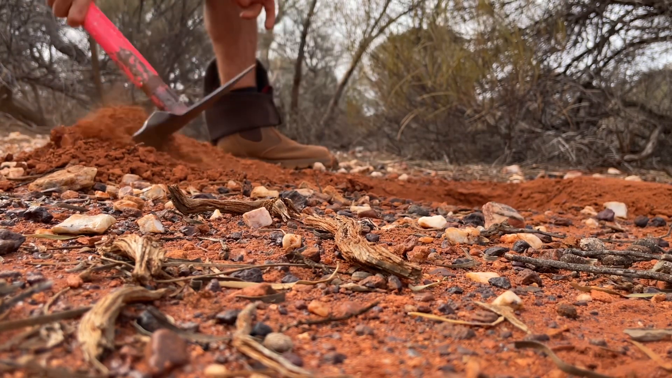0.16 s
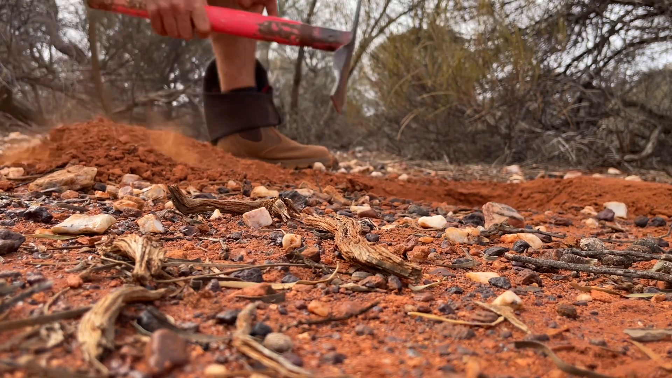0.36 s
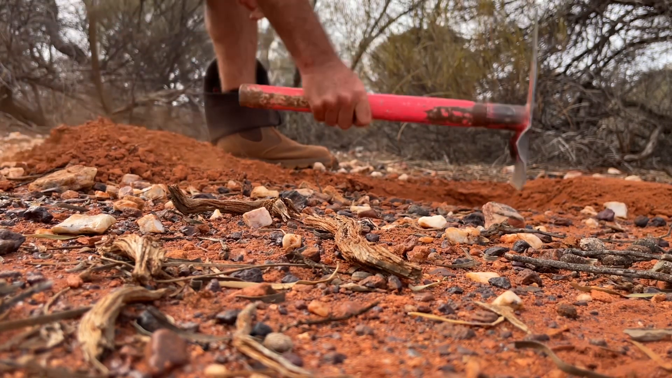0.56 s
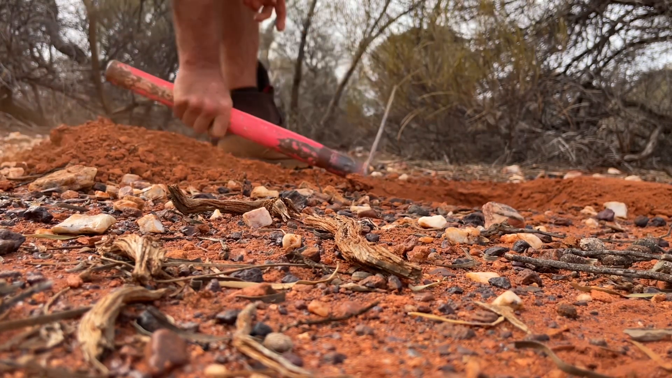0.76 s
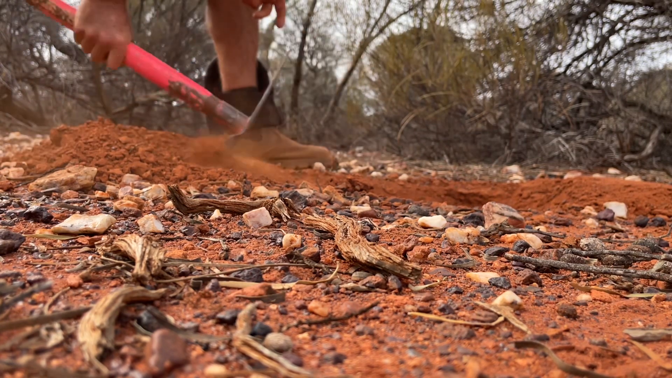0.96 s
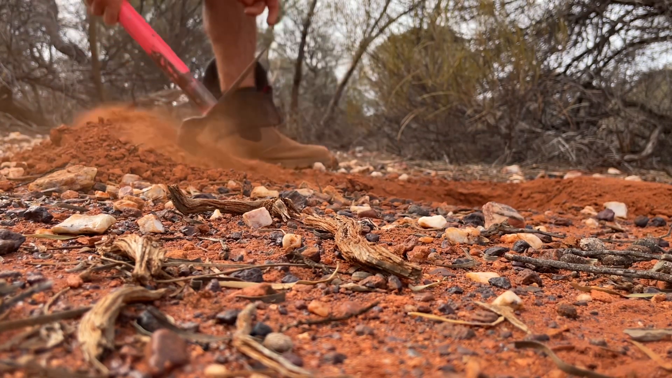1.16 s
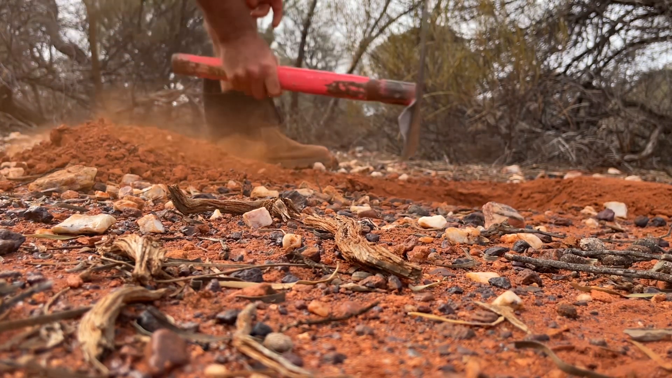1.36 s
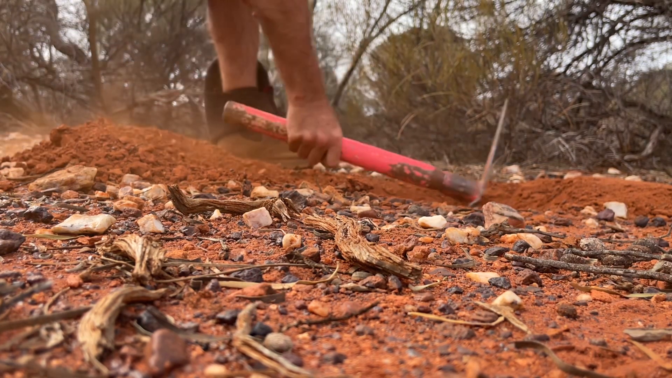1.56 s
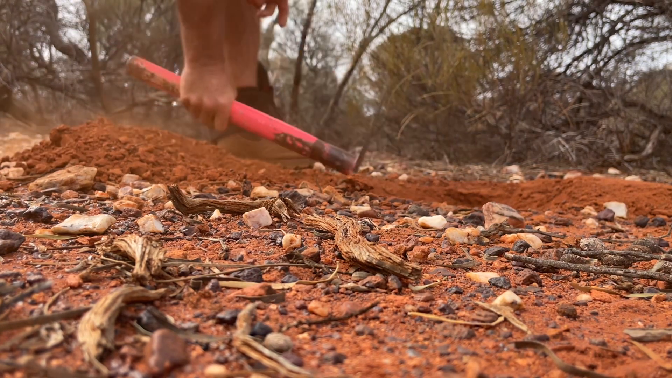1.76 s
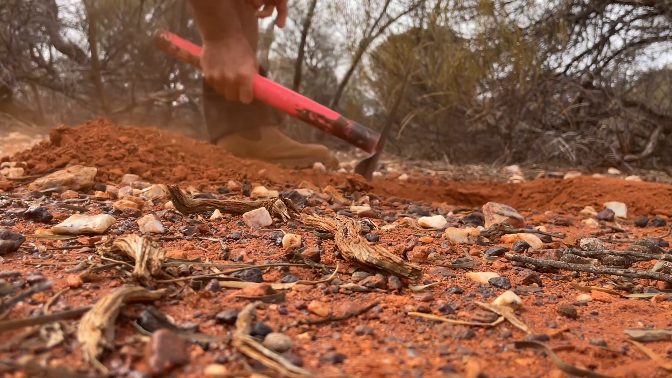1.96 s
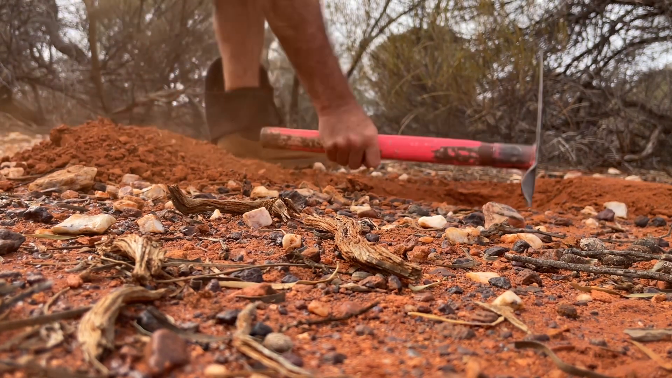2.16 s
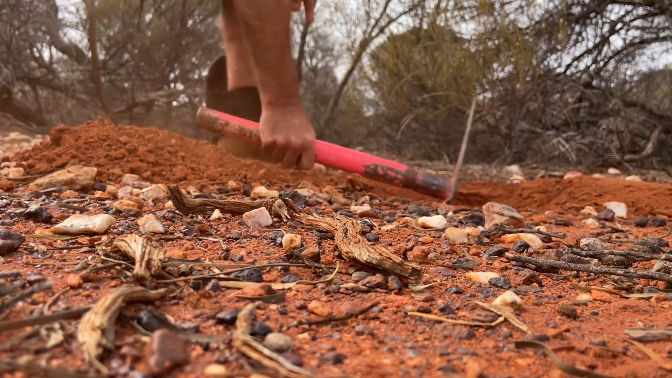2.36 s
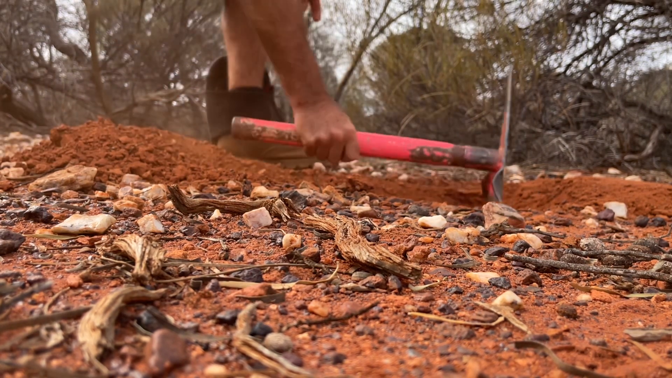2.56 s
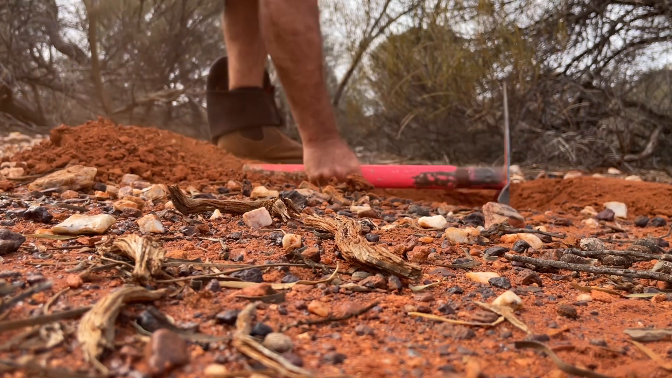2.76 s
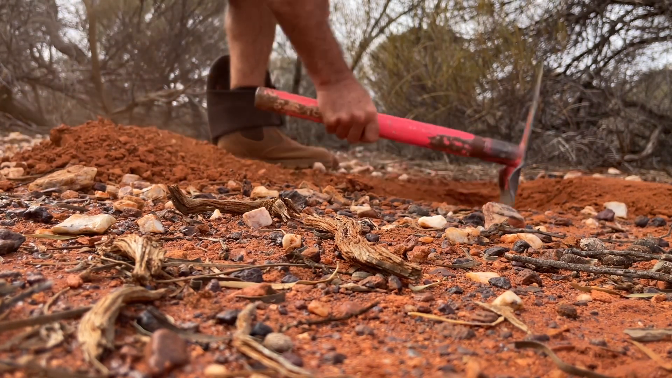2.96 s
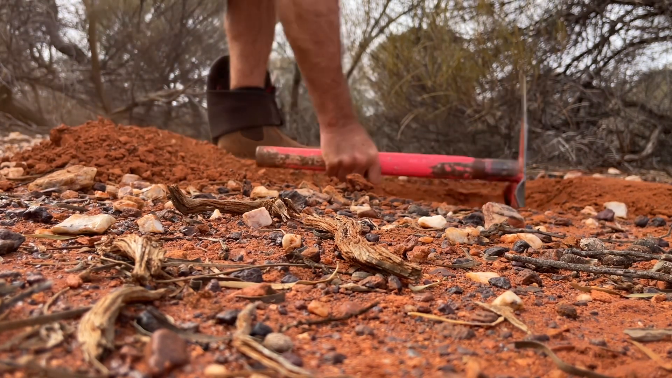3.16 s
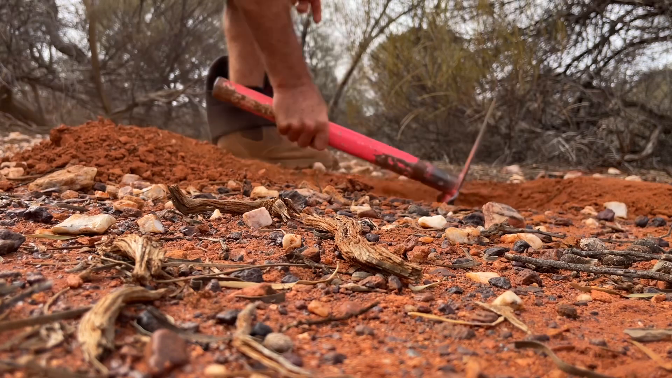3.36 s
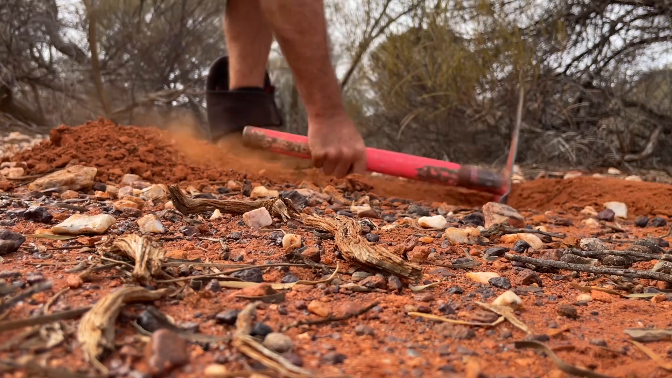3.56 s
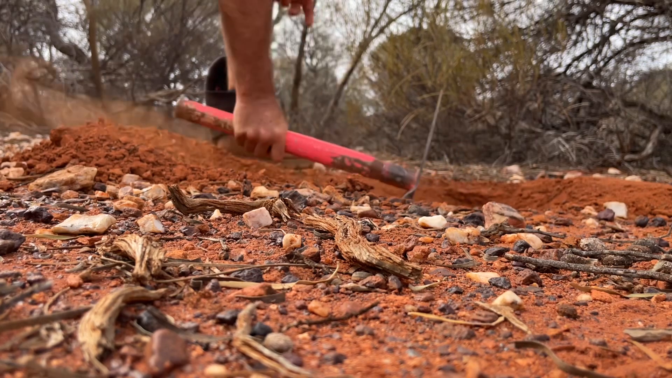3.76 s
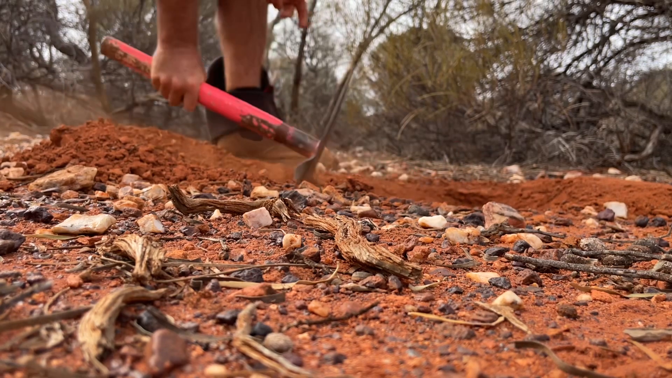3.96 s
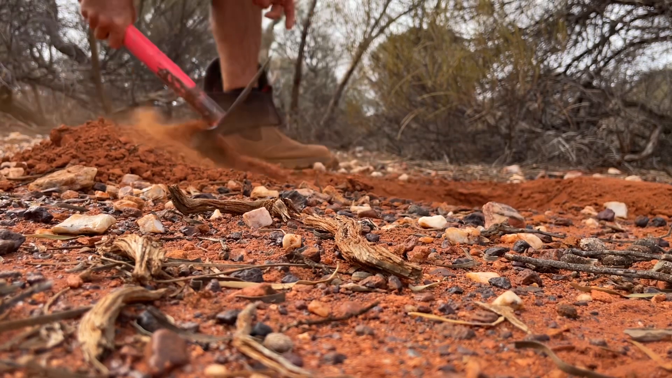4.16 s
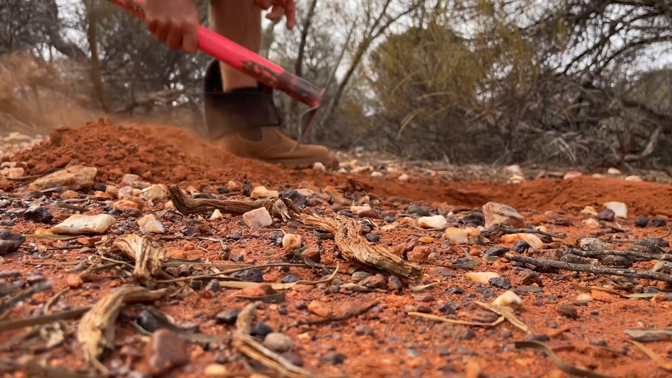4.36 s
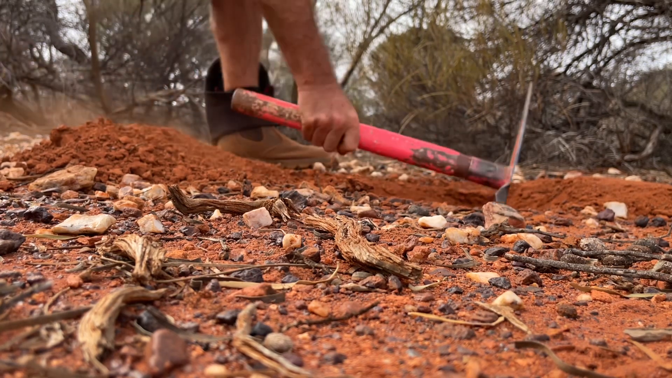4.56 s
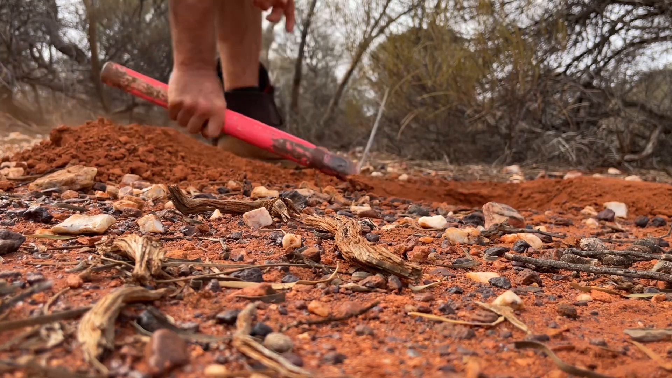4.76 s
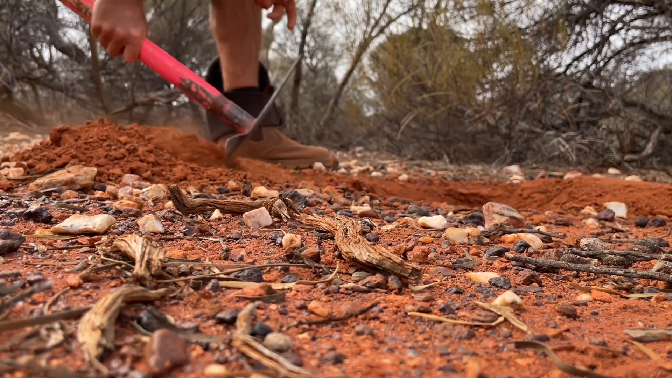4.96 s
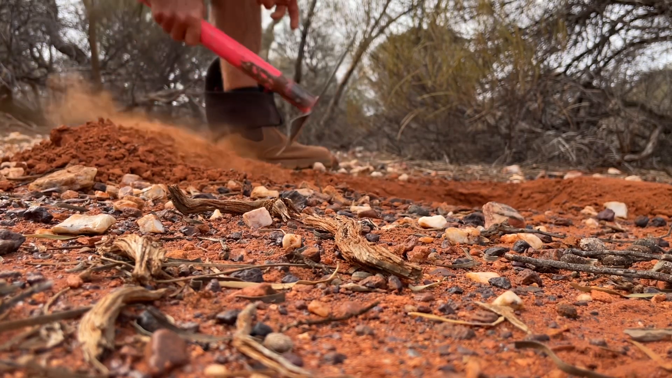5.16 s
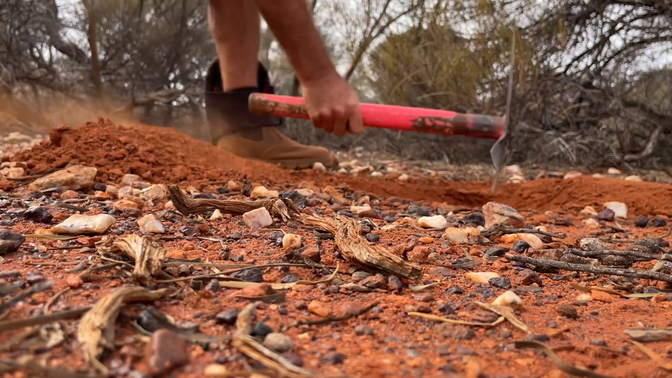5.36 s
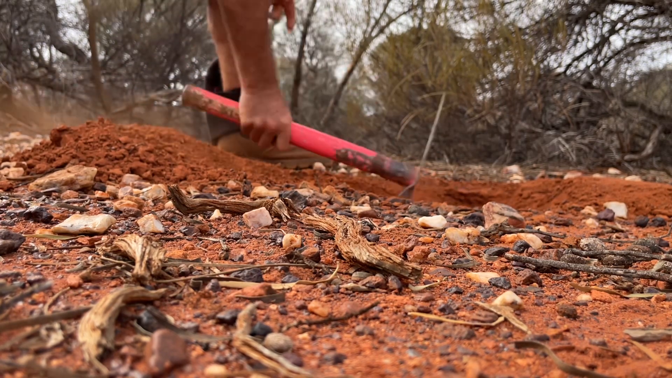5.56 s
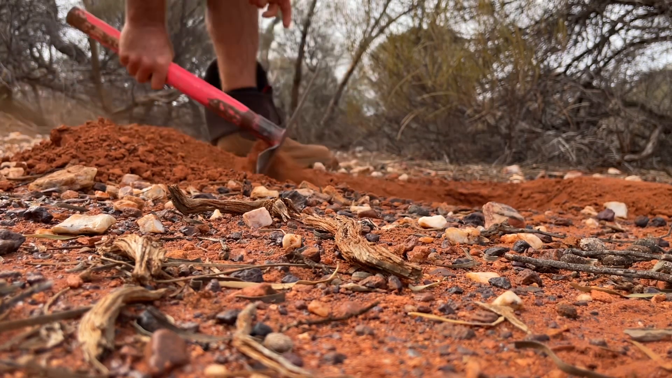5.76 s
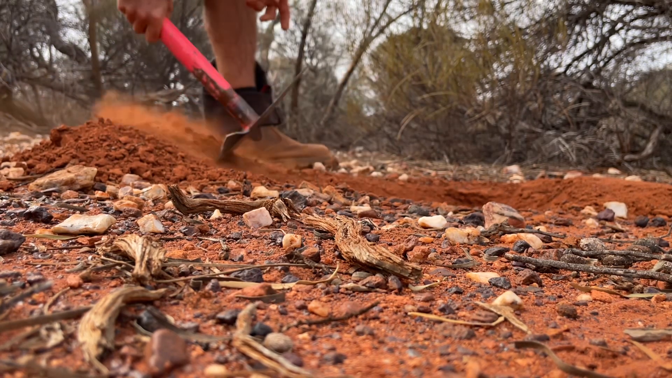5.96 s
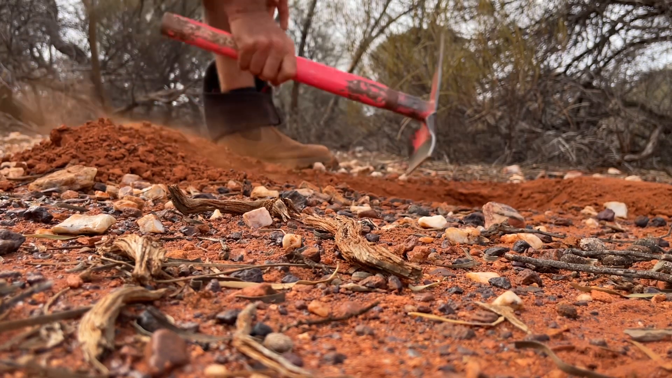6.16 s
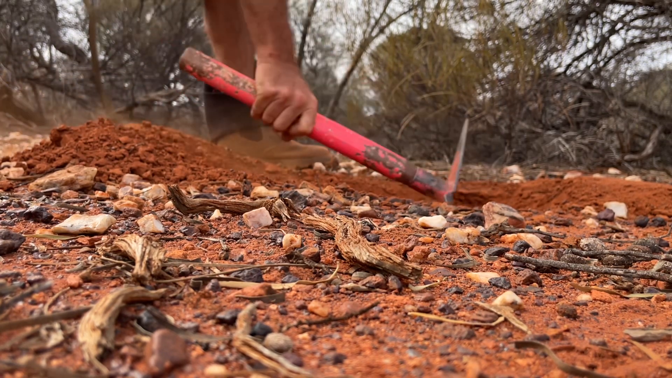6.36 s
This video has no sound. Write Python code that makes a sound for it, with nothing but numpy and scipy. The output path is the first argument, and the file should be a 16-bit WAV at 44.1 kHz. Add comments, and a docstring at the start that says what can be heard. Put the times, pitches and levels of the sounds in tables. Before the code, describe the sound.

Close, gritty digging: pick blows thump and drag through gravelly earth, stones clack, steel rings briefly, and loose dust patters down outdoors.

```python
"""Close to a ground-level microphone, the last scrape of a steel pick's stroke is already under way and a first
cloud of dust comes down. Then the pick chops into dry stony soil, nine strokes 0.4 to 1 s apart: each bite thuds,
and the blade is dragged on through clods and grit (damped grains), cracks against stones (noise bursts) and rings
(bending modes). Between strokes the freed blade sings, boots shift and thrown dust hisses down (fine filtered
grains). Faint wind in the bush (patchy filtered noise) lies behind it all from start to end."""
import sys
import numpy as np
from scipy import signal
from scipy.fft import rfft, irfft, next_fast_len
from scipy.io import wavfile
from scipy.ndimage import uniform_filter1d, map_coordinates

SR = 44100
rng = np.random.default_rng(int(sys.argv[2]) if len(sys.argv) > 2 else 0)


def put_to_file(sound):
    """Save the sound as 16-bit audio at rate SR, in the file named by the first command-line argument."""
    columns = np.atleast_2d(sound).T  # one column per channel
    safe = np.clip(columns, -1, 1)
    whole_steps = np.round(safe * 32767)
    wavfile.write(sys.argv[1], SR, whole_steps.astype(np.int16))


N = 286644

# the blade bites, ploughs in until it jams, and is pulled free:
# (bite [s], jam [s], length of pull [s], soil at the jam [dB], grit at the jam [dB], rise up to the jam [dB],
#  fade over the pull [dB], pitch shift of loose pieces [octaves], pitch round which stray notes lie [Hz],
#  scrape ring [dB], bite [dB], bite thud [dB], its nominal pitch [Hz], jam thud [dB], its nominal pitch [Hz])
STROKES = [(0.584, .776, 0.27, -26.5, -29, 7.5, 20.5, 0.13, 3060, -2, -32.5, -21.5, 181, -15, 158.4),
           (1.475, 1.722, 0.083, -29, -31.5, 5.5, 3, 0.15, 5200, -3.5, -48.5, -23.5, 101, -20, 161.4),
           (2.145, 2.251, 0.054, -31, -34, 8, 5.5, -.2, 3860, -2.5, -39, -12.5, 120, -32.5, 183),
           (2.683, 2.772, 0.026, -35.5, -37.5, -3, 2, -0.23, 6580, -1.5, -28.5, -10, 137.3, -36, 179),
           (3.106, 3.166, 0.063, -33.5, -37.5, -9, -3.5, -0.018, 2370, 1.5, -24, -13.5, 129, -17.5, 134),
           (3.533, 3.875, 0.12, -30.5, -34, 3.5, 6, 0.053, 2610, -6, -27.5, -17.5, 129, -14, 181.7),
           (4.537, 4.752, 0.22, -25.5, -30, 16, 17.5, .35, 3470, 2, -29.5, -23, 164.4, -23.5, 184.8),
           (5.413, 5.637, 0.16, -28.5, -32, 9.5, 8, -0.16, 4740, -2, -23, -23, 139.7, -15, 140.5),
           (6.284, 6.377, 0.12, -33.5, -36.5, 10, -5.5, 0.23, 3470, 2.5, -38, -15.5, 162, -24.5, 195)]
# bending modes of the pick head: (frequency [Hz], level [dB], t60 when undamped [s])
STEEL_MODES = [(1138, -14, .06), (1560, -8, .09), (2345, -4, .15), (3012, -6.5, .38), (3280, -6, .3),
               (3590, 0, .1), (4262, -10, .07), (4899, -3, .11), (5672, -9, .15), (6032, -6, .12),
               (6510, -14, .16), (10000, -16, .14), (10900, -19, .1), (12420, -21, .12)]


def drags():
    """Clods tumble and shake the handle; grit and pebbles rasp along the steel and keep it ringing."""
    # spectra of churned soil and scraped grit: (frequency [Hz], relative level [dB per Hz])
    soil_spectrum = [(30, -68), (60, 3.5), (100, 7), (160, 7), (270, -1), (390, 3.5), (600, -2.5),
                     (850, -12), (1400, -26), (3000, -52)]
    grit_spectrum = [(400, -10), (900, -1.5), (1500, 3), (2600, -1.5), (3500, 7), (4200, -19.5),
                     (6000, -8.5), (7300, -41.5), (8500, -48), (10200, -13), (13200, -15.5), (14300, -18),
                     (16000, -29.5)]
    # modes of the handle carrying the head: (frequency [Hz], level [dB], t60 [s])
    handle_modes = [(131, -5, 0.18), (157.7, -3, 0.3), (193, -6, 0.22), (357.2, -8, 0.13),
                    (555, -8, 0.0377)]
    soil_gain, grit_gain = effort()
    piece_octaves, _, ring_db = by_stroke()

    crunch = soil_gain * grains(rate=2400, spread_db=1.5, clump_rate=140, clump_db=3.0)
    clods = soil_gain * lumps(count=1700, centre_hz=441.5, octaves=0.403, cycles=2.4,
                              spread_db=10, shift=piece_octaves)
    handle = rubbed(crunch, handle_modes, damping=1, flicker_rate=11, flicker_db=8.5)
    soil = amp(-7) * colour(crunch, soil_spectrum) + amp(-8.5) * clods + amp(-8.0) * handle

    # the blade catches and breaks free
    slips = unit(amp(5.5 * np.tanh(.7 * wobble(170) + wobble(75))))
    scrape = slips * grains(rate=9000, spread_db=2, clump_rate=250, clump_db=4)
    grit = colour(grit_gain * scrape, grit_spectrum)
    pebbles = grit_gain * slips * lumps(count=2200, centre_hz=2257, octaves=0.59, cycles=5.6,
                                        spread_db=7, shift=piece_octaves)
    # bigger pieces knock
    cobbles = grit_gain * lumps(count=900, centre_hz=1310, octaves=.7, cycles=1.7,
                                spread_db=7.0, shift=piece_octaves)
    steel_force = amp(ring_db) * pressed(grit_gain) * scrape
    steel = rubbed(steel_force, STEEL_MODES, damping=4, flicker_rate=32, flicker_db=8)
    return soil + amp(-12.0) * grit + amp(-16.0) * pebbles + amp(-11.5) * cobbles + amp(-14) * steel


def effort():
    """Gains of soil and grit: most grow with depth to the jam, ease in the pull and die as the blade leaves."""
    # brief scrapes of soil and grit: (middle [s], half length [s], soil [dB], grit [dB])
    brief_scrapes = [(.005, 0.026, -36, -32.5), (0.069, 0.028, -40, -34.5), (0.166, 0.03, -68.5, -46.5),
                     (1.202, 0.019, -47.5, -51.5), (2.365, 0.012, -40.5, -42), (2.429, 0.019, -66, -45),
                     (4.007, 0.016, -41, -36), (4.099, 0.046, -38, -35), (5.825, 0.095, -73, -49.5)]
    # the blade loses its grip in the drag: (middle [s], half length [s])
    skips = [(0.915, 0.0084), (3.663, .014), (3.731, .02), (4.831, 0.016)]
    skip_db = -10  # fall of the grit in a skip; the soil falls half as far
    # after the bite the pick stalls before the pull takes hold
    rebound_s, rebound_half_s, rebound_db = 0.029, 0.022, -4
    attack_s = 0.005
    soil_release, grit_release = 311, 338  # dB per s once the pull is over
    # spurt of grit as the edge breaks the crust, relative to the bite
    crust_db, crust_decay_s = -7.5, 0.016
    # soil crushed by the bite, relative to its thud
    crush_db, crush_decay_s = -12.5, 0.0094

    soil, grit, t = np.zeros(N), np.zeros(N), np.arange(SR) / SR
    stalled = rebound_db * np.exp(-((t - rebound_s) / rebound_half_s) ** 2)
    attack = np.minimum(t / attack_s, 1)
    for bite, jam, pull, soil_db, grit_db, rise_db, fade_db, _, _, _, bite_db, thud_db, *_ in STROKES:
        push = jam - bite
        shallow = rise_db * np.clip(1 - t / push, 0, 1)
        eased = fade_db * np.clip((t - push) / pull, 0, 1)
        free_s = np.maximum(t - push - pull, 0)
        course_db = stalled - shallow - eased
        crust = amp(bite_db + crust_db) * np.exp(-t / crust_decay_s)
        crushed = amp(thud_db + crush_db) * np.exp(-t / crush_decay_s)
        add(soil, bite, attack * (crushed + amp(soil_db + course_db - soil_release * free_s)))
        add(grit, bite, attack * (crust + amp(grit_db + course_db - grit_release * free_s)))
    for s, half_length, soil_db, grit_db in brief_scrapes:
        swell = swell_at(s, half_length)
        soil += amp(soil_db) * swell
        grit += amp(grit_db) * swell
    skipped_db = skip_db * sum(swell_at(s, half_length) for s, half_length in skips)
    return soil * amp(skipped_db / 2), grit * amp(skipped_db)


def by_stroke():
    """Per sample, held from bite to bite: pitch shift of loose pieces, pitch of stray notes, ring level."""
    rows = np.array(STROKES)
    bites = rows[:, 0]
    stroke = np.maximum(np.searchsorted(bites, np.arange(N) / SR, side="right") - 1, 0)
    piece_octaves, ring_hz, ring_db = rows[:, 7:10].T
    return piece_octaves[stroke], ring_hz[stroke], ring_db[stroke]


def pressed(grit_gain):
    """The part of the scrape that rings the steel: a light touch hardly does."""
    press_db = -44.5  # below this level of scrape the steel rings less and less
    return grit_gain * np.minimum(grit_gain / amp(press_db), 1)


def thuds():
    """The pitch of the thump falls as the ground takes up the blow."""
    out, t = np.zeros(N), np.arange(SR // 8) / SR
    u = t / 0.014
    swell = (u * np.exp(1 - u)) ** 6.9 + 0.076 * u * np.exp(1 - u) ** 0.46
    for s, db, hz in blows():
        pitch = hz * (0.743 + 3 * np.exp(-t / 0.00535))
        add(out, s, amp(db - 3.5) * swell * np.sin(2 * np.pi * np.cumsum(pitch) / SR))
    return out


def blows():
    """(time [s], level [dB], nominal pitch [Hz]) of every thud: each stroke's bite and jam, and the boots."""
    # a boot shifts: (time [s], relative level [dB], nominal pitch [Hz])
    steps = [(0.983, -33.5, 103), (3.489, -34, 77.7), (5.061, -25.5, 86), (5.157, -39, 75.4)]
    lag_s = 0.0012  # the ground takes up the blow just after the edge touches
    bites = [(bite + lag_s, db, hz) for bite, *_, db, hz, jam_db, jam_hz in STROKES]
    jams = [(jam, jam_db, jam_hz) for bite, jam, *_, jam_db, jam_hz in STROKES]
    return bites + jams + steps


def bursts():
    """A hard clod gives way in one short, dull crunch of noise round its own pitch."""
    # a hard clod bursts under the blade: (time [s], relative level [dB], pitch [Hz])
    hard_clods = [(0.813, -20.5, 400), (1.649, -27, 604), (2.25, -20, 560), (2.275, -29, 480),
                  (2.687, -19.5, 297), (2.767, -23.5, 370), (3.112, -20.5, 560), (3.76, -20.5, 425),
                  (3.845, -22.5, 397), (3.996, -23, 404), (4.858, -22.5, 424), (5.688, -25, 393),
                  (5.762, -24, 370), (6.326, -23, 447)]
    peak_s = 0.0041  # time to the height of a burst
    slope_db = 20.5  # fall of its spectrum per octave either side of its pitch
    out, t = np.zeros(N), np.arange(SR // 16) / SR
    force = t / peak_s * np.exp(1 - t / peak_s)
    for s, db, hz in hard_clods:
        spectrum = [(hz * 2. ** octave, -slope_db * abs(octave)) for octave in range(-3, 6)]
        add(out, s, amp(db - 6) * noise_burst(force, spectrum))
    return out


def stones():
    """A stone grinds for milliseconds: a knock in the soil, a crack, a snap, its own note and a ring of steel."""
    # spectra of the dull knock, the crack and the bright snap: (frequency [Hz], relative level [dB per Hz])
    knock_spectrum = [(80, -34.5), (250, -3.5), (600, 6.5), (1000, -10.5), (2000, -21.5)]
    crack_spectrum = [(500, -23), (1000, 3.5), (1800, -1), (3300, 1.5), (4500, -4.5), (6000, -3.5),
                      (7500, -27.5)]
    snap_spectrum = [(2500, -42), (4500, -13.5), (6200, -10.5), (7400, 0.5), (8600, -6.5), (10500, -4.5),
                     (13000, -6), (16000, -33)]
    out, t = np.zeros(N), np.arange(SR // 16) / SR
    for s, db, knock_db, snap_db, ring_db, clink_hz in contacts():
        grind = np.interp(db, [-14, -4], [.007, .004])  # s; the hardest blows are the shortest
        decay = np.exp(-(t / grind) ** 2) + 0.0064 * np.exp(-t / 0.0037)
        force = (1 - np.exp(-t / (0.27 * grind))) * decay
        # the crack gathers round the clink pitch
        crack = [(hz, level - 6 * abs(np.log2(hz / clink_hz))) for hz, level in crack_spectrum]
        parts = (crack, -6), (knock_spectrum, knock_db), (snap_spectrum, snap_db - 14.5)
        for spectrum, part_db in parts:
            add(out, s, amp(db + part_db) * noise_burst(force, spectrum))
        add(out, s, stone_note(t, db, clink_hz))
        ring = blade(damping=3.6, scatter_db=4, near_hz=clink_hz, focus_db=16)
        add(out, s, amp(db + ring_db - 2.5) * swelling(ring, 0.0016))
    return out


def contacts():
    """Every hard contact of the steel: the tick that opens each stroke, and the stones."""
    # the blade meets a stone: (time [s], relative level [dB], then over it: dull knock [dB], bright snap [dB],
    # blade ring [dB]; clink pitch [Hz])
    stone_hits = [(0.5998, -26, 0.5, -8, -6, 1140), (0.6658, -27.5, 1.5, -21, 1, 3200),
                  (0.7309, -30, -9.5, -21, 4, 4600), (0.753, -32, 11, -21, -1, 2900),
                  (0.762, -13, -1.5, -17.5, 10, 1400), (0.7831, -19.5, 1.5, -37, 0.5, 3230),
                  (0.905, -23, -3.5, -3.5, -26, 3300), (0.9365, -20.5, -11, 1, -8, 2870),
                  (1.482, -31.5, 1.5, -10.5, -2, 1230), (1.6274, -30, 15, -12, 15, 1770),
                  (1.653, -30.5, -2, -14, 9, 4570), (1.706, -25.5, 5.5, -29, 0, 3030),
                  (1.7478, -17.5, 1.5, -44.5, 6, 1940), (2.145, -33.5, 8.5, -11, -2, 1420),
                  (2.1827, -30, 1, -4, -12, 1210), (2.2512, -35, 10, -21, -15, 3460),
                  (2.4166, -41.5, 4, 3, 4, 4830), (2.686, -31, 7, 4, -1, 6600),
                  (3.1068, -27, 4.5, -8, -14, 3160), (3.1705, -17, -0.5, -9, -29, 2430),
                  (3.204, -23, -2.5, -12, -13, 1820), (3.2199, -23.5, -11, -26, -9, 1810),
                  (3.3288, -50, 11, -21, -9, 1230), (3.681, -37.5, 8.5, -15, -31, 2880),
                  (3.753, -38.5, -9, -26, 10.5, 2860), (3.8063, -18.5, -5.5, -9, 0.5, 5120),
                  (3.823, -20, -1, -27, -16, 3370), (3.877, -12, -3, -17, -3, 2955),
                  (3.8993, -18.5, -3, -35, 2, 1210), (3.947, -27.5, 4.5, -31, -7, 1390),
                  (4.018, -23, -6.5, -8, -11, 2900), (4.0817, -25, -5, -12.5, -17, 1520),
                  (4.2876, -46, -10, -4, 6, 1210), (4.71, -17.5, 1, -30, -13, 1870),
                  (4.7544, -10.5, -2.5, -30.5, -17, 1666), (4.7595, -13, -12, -22.5, 12, 1440),
                  (4.799, -29.5, 2, -18.5, 4, 3520), (4.883, -28, -10, -13, 0, 2530),
                  (4.9176, -25, -7, -5.5, 2, 3380), (5.5758, -27, -1, -9, 11.5, 5000),
                  (5.6346, -3, -16, -18, -27, 2153), (5.659, -27.5, -13, -23, -9, 1190),
                  (6.0086, -40, -8, 12.5, -21, 4200), (6.324, -27, -15, -8, -7, 1480),
                  (6.375, -26, 9, -16, 7.5, 5000), (6.4173, -24, -5.5, -8, 7, 3670),
                  (6.4777, -22.5, 2.5, -18, 15, 1600)]
    # the edge ticks on the crust: (level over the bite [dB], knock [dB], snap [dB], ring [dB], clink pitch [Hz])
    bite_tick = (-3.5, -2.5, 10, -10.5, 2803.5)
    tick_db, *tick_colour = bite_tick
    ticks = [(bite, bite_db + tick_db, *tick_colour) for bite, *_, bite_db, _, _, _, _ in STROKES]
    return ticks + stone_hits


def stone_note(t, db, clink_hz):
    """The brief note of the stone itself, which only a hard blow brings out."""
    # a struck stone's own modes: (multiple of its clink pitch, level [dB], t60 [s])
    note_modes = [(0.998, 9, 0.0097), (1.986, -8.5, 0.029)]
    note_db, grows = 0.5, 0.26  # relative to a full-scale blow; further dB for each dB of force
    note = sum(amp(level - 60 * t / t60) * np.sin(2 * np.pi * multiple * clink_hz * t)
               for multiple, level, t60 in note_modes)
    return amp(db + note_db + grows * db) * note * (1 - np.exp(-t / 0.0018))


def sings():
    """A pebble dragged along the steel excites one mode; faint notes fall at random round the stroke's pitch."""
    # a pebble rubs the blade into a short note: (time [s], level [dB], mode [Hz])
    clear_notes = [(0.618, -40.5, 3280), (0.828, -35, 3280), (1.685, -41.5, 6032), (1.783, -45, 6032),
                   (2.698, -39, 3280), (4.772, -29.5, 3012), (5.415, -36, 3280), (6.419, -31.5, 3590),
                   (6.448, -32, 3280)]
    swell_s = 0.0091  # time to the height of a note
    stray_db = -13  # the many fainter notes, relative to the scraped grit
    out, t = np.zeros(N), np.arange(SR // 16) / SR
    modes = np.array(STEEL_MODES)[:, 0]
    _, grit_gain = effort()
    _, ring_hz, ring_db = by_stroke()

    start = rng.integers(0, N, 260)
    interval, size = np.clip(rng.standard_normal((2, len(start))), -2, 1.5)
    stray_gain = pressed(grit_gain)[start] * amp(stray_db + ring_db[start] + 2 * size)
    stray_hz = ring_hz[start] * 2 ** (.75 * interval)
    notes = [(s, amp(db), hz) for s, db, hz in clear_notes]
    notes += list(zip(start / SR, stray_gain, stray_hz))

    u = t / swell_s
    for s, gain, hz in notes:
        nearest_hz = modes[np.argmin(abs(modes - hz))]
        add(out, s, gain * u * np.exp(1 - u) * np.sin(2 * np.pi * nearest_hz * t))
    return out


def lifts():
    """Sliding clear of the soil, the head swells into an undamped ring."""
    # the blade slips free and sings: (time [s], relative level [dB], strongest mode [Hz], swell time constant [s])
    releases = [(0.158, -46, 2345, 0.013), (1.807, -31.5, 2345, 0.016), (1.803, -39, 6032, 0.0067),
                (1.813, -50, 5672, 0.0055), (2.421, -56, 3012, 0.0086), (2.421, -46, 4899, 0.0077),
                (2.857, -47, 3150, 0.036), (4.108, -40.5, 2345, .006), (4.922, -46, 3100, .006),
                (5.781, -47, 2910, 0.0065)]
    out = np.zeros(N)
    for s, db, hz, swell_s in releases:
        ring = blade(damping=1, scatter_db=1, near_hz=hz, focus_db=120)
        add(out, s, amp(db + 7.0) * swelling(ring, swell_s))
    return out


def blade(damping, scatter_db, near_hz, focus_db):
    """The head's ring: contact favours modes near one pitch (focus_db per octave); damping shortens it."""
    t = np.arange(int(SR * .35 / max(damping, 1))) / SR
    hz, db, t60 = np.transpose(STEEL_MODES)[:, :, None]
    db = db - np.minimum(focus_db * np.abs(np.log2(hz / near_hz)), 42)
    db = db + scatter_db * np.clip(rng.standard_normal(hz.shape), -1, 1)
    phase = 2 * np.pi * rng.random(hz.shape)
    return np.sum(amp(db - 60 * t * damping / t60) * np.sin(2 * np.pi * hz * t + phase), axis=0)


def spray():
    """Loosened pebbles skitter off to the left and right of the trench, each a short damped note."""
    _, grit_gain = effort()
    sides = [lumps(count=4000, centre_hz=2710, octaves=0.54, cycles=6.1, spread_db=0.5) for side in "LR"]
    return amp(-15) * grit_gain * np.array(sides)


def dust():
    """Fine thrown soil trickles down on the heap, cloud by cloud, with coarser crumbs among it."""
    # spectrum of the falling dust: (frequency [Hz], relative level [dB per Hz])
    dust_spectrum = [(1000, 7), (3000, -1), (5000, 1.5), (6400, 2.5), (7500, 3.5), (8600, -14.5),
                     (10500, -4.5), (13000, -6.5), (14500, -29.5)]
    # a cloud of thrown dust comes down: (thickest [s], level [dB], half length [s])
    clouds = [(0.368, -71, 0.48), (1.44, -62, 0.18), (2.642, -64, 0.087), (3.463, -67, 0.17),
              (5.022, -65, 0.15), (6.069, -60.5, 0.2)]
    trickle_db = -75.5  # the heap never quite settles
    patter = grains(rate=11000, spread_db=3.5, clump_rate=22, clump_db=-1)
    crumbs = lumps(count=2500, centre_hz=900, octaves=.7, cycles=1.5, spread_db=6)
    falling = amp(trickle_db) + sum(amp(db) * swell_at(s, half_length) for s, db, half_length in clouds)
    return falling * (colour(patter, dust_spectrum) + amp(-11.5) * crumbs)


def ports(x):
    """Two microphone ports hear x with a phase that follows the blade; the left is louder round 3 kHz."""
    # lead of the left port for sound from the far end of the trench: (frequency [Hz], phase [radians])
    port_phase = [(300, 0), (2600, .15), (5000, 0), (6030, -.6), (6720, -.9), (7670, -2.7), (9300, -3.3),
                  (10200, -4.7), (12700, -4.6), (14500, -3.4)]
    # its further lead when the blade has reached the heap on the left: (frequency [Hz], phase [radians])
    heap_phase = [(300, 0.46), (1200, 0.2), (2150, 7), (2700, 2), (3500, 4.5), (4200, 8.5), (4900, 2.5),
                  (6100, 6.5), (8000, -3)]
    hz, t, z = signal.stft(x, SR, nperseg=512)
    place = np.interp(t, np.arange(N) / SR, leftward())
    lean_db = along([(400, 1.2), (1200, 0.4), (3000, 3.5), (8000, -0.5)], hz)[:, None]
    lead = along(port_phase, hz)[:, None] + along(heap_phase, hz)[:, None] * place
    heard = []
    for side in (.5, -.5):  # left, right
        turned = z * amp(side * lean_db) * np.exp(1j * side * lead)
        heard.append(signal.istft(turned, SR, nperseg=512)[1][:N])
    return np.array(heard)


def leftward():
    """Place of the blade, 0 at the bite and 1 at the heap: it gathers speed in the drag and is carried back."""
    crossing_s = 0.95  # time the blade takes from its bite to the heap
    path = [(0.0054, 0.57)]
    for bite, jam, pull, *_ in STROKES:
        path += [(bite, 0), (jam + pull, min((jam + pull - bite) / crossing_s, 1))]
    return curve(path) ** 1.28


def bush(x):
    """A short diffuse answer from ground and shrubs: x convolved with decaying noise."""
    # scatter from ground and bushes: (frequency [Hz], t60 [s])
    scatter_t60 = [(150, 0.22), (1000, 0.14), (4000, 0.14), (12000, 0.08)]
    wide_hz = 1200  # below this the scatter reaches both ports more and more alike
    hz, t, z = signal.stft(rng.standard_normal((2, SR // 2)), SR, nperseg=256)
    side = z[1] * np.minimum(hz / wide_hz, 1)[:, None]
    decay = amp(-60 * t / along(scatter_t60, hz)[:, None])
    tail = signal.istft(np.array([z[0] + side, z[0] - side]) * decay, SR, nperseg=256)[1]
    return signal.fftconvolve(x, tail / np.linalg.norm(tail[0]), axes=1)[:, :N]


def wind():
    """Faint moving air in the bush, nearly alike at both ports: coloured noise under a slow level curve."""
    # spectrum of the moving air: (frequency [Hz], relative level [dB per Hz])
    air_spectrum = [(20, -32), (50, -1.5), (90, 2), (140, -0.5), (250, -6), (600, -4.5), (900, -9),
                    (1400, -23.5), (2200, -29.5), (4000, -81.5), (12000, -37.5), (15000, -78.5)]
    # the breeze: (time [s], level [dB])
    breeze = [(0, -53.5), (1.3, -55), (2, -57), (2.6, -53.5), (3, -55.5), (3.4, -53), (4.4, -56.5),
              (5.2, -54.5), (6.5, -55.5)]
    air = patchy(colour(rng.standard_normal((2, N)), air_spectrum), depth_db=3.5)
    mid, side = air * amp([[0], [-10]])
    return amp(curve(breeze)) * np.array([mid + side, mid - side])


def patchy(x, depth_db):
    """Each band swells and sinks on its own, as eddies pass through the shrubs."""
    z = signal.stft(x, nperseg=1024)[2]
    field = uniform_filter1d(rng.standard_normal(z.shape[1:]), size=5, axis=0)  # smooth over frequency
    field = uniform_filter1d(field, size=7, axis=1)  # smooth over time
    return signal.istft(z * amp(depth_db * unit(field)), nperseg=1024)[1][:, :N]


def grains(rate, spread_db, clump_rate, clump_db):
    """Tiny fractures of uneven size, rate a second, bunched by stick and slip; rms 1."""
    size = amp(spread_db * np.clip(rng.standard_normal(N), -2, 2)) * (rng.random(N) < rate / SR)
    clumps = amp(clump_db * np.clip(wobble(clump_rate), -2, 1.7))
    return unit(rng.choice([-1, 1], N) * size * clumps)


def lumps(count, centre_hz, octaves, cycles, spread_db, shift=0):
    """Colliding pieces, each a short damped note of its own pitch; rms 1."""
    start = rng.integers(0, N, (count, 1))
    pitch, size = np.clip(rng.standard_normal((2, count, 1)), -2, 1.8)
    hz = centre_hz * 2 ** (octaves * pitch + np.broadcast_to(shift, N)[start])
    n = np.arange(min(int(5 * cycles * SR / centre_hz), 1500))
    turns = hz * n / SR
    envelope = np.exp(-turns / cycles) * (1 - np.exp(-2 * turns))
    notes = amp(spread_db * size) * np.sqrt(hz) * np.sin(2 * np.pi * turns) * envelope
    return unit(np.bincount((start + n).ravel(), notes.ravel(), minlength=N)[:N])


def rubbed(force, modes, damping, flicker_rate, flicker_db):
    """Resonant modes driven by a moving contact, which feeds each one unevenly."""
    out = np.zeros(N)
    for hz, db, t60 in modes:
        r = np.exp(-np.log(1000) * abs(damping / t60) / SR)  # pole radius
        flicker = np.tanh(wobble(flicker_rate) + .5 * wobble(3.104))
        drive = force * unit(amp(flicker_db * flicker))
        poles = [1, -2 * r * np.cos(2 * np.pi * hz / SR), r * r]
        out += amp(db) * np.sqrt(1 - r) * signal.lfilter([1, 0, -1], poles, drive)
    return out


def noise_burst(force, spectrum):
    """Coloured noise shaped by a force, scaled to the energy of that force."""
    burst = colour(force * rng.standard_normal(len(force)), spectrum)
    return burst * np.linalg.norm(force) / np.linalg.norm(burst)


def swelling(ring, swell_s):
    """A ring that sets in gradually, with time constant swell_s."""
    return ring * (1 - np.exp(-np.arange(len(ring)) / SR / swell_s))


def swell_at(middle, half_length):
    """A bell-shaped rise and fall of gain."""
    return np.exp(-((np.arange(N) / SR - middle) / half_length) ** 2)


def wobble(rate):
    """A smooth random curve, rate knots a second."""
    coarse = np.linspace(0, N, 8000)
    knots = rng.standard_normal(8000)
    return np.interp(np.arange(N), coarse, map_coordinates(knots, [coarse * rate / SR]))


def colour(x, spectrum):
    """Causal (minimum-phase) filter of unit power with the given spectrum."""
    def response(hz):
        rolloff = np.maximum(hz / spectrum[-1][0], 1) ** 2  # above the last point
        gain = unit(amp(along(spectrum, hz)) / rolloff)
        # folding the cepstrum forward in time makes the filter causal
        cepstrum = irfft(np.log(gain + 1e-6))
        cepstrum[1:len(hz) - 1] *= 2
        cepstrum[len(hz):] = 0
        return np.exp(rfft(cepstrum))
    return filtered(x, response)


def filtered(x, response):
    """x times a complex response of frequency."""
    size = 2 * next_fast_len(x.shape[-1] // 2 + 2048)
    return irfft(rfft(x, size) * response(np.fft.rfftfreq(size, 1 / SR)))[..., :x.shape[-1]]


def amp(db):
    """Decibels to gain."""
    return np.exp(np.asarray(db) * (np.log(10) / 20))


def unit(x):
    """Scale to rms 1."""
    return x / np.sqrt(np.mean(x ** 2) + 1e-20)


def along(points, hz):
    """Read (frequency [Hz], value) points on a log axis."""
    f, v = np.transpose(points)
    return np.interp(np.log(hz + 1), np.log(f + 1), v)


def curve(rows):
    """One value per sample from (time [s], value) rows."""
    s, value = np.transpose(rows)
    return np.interp(np.arange(N) / SR, s, value)


def add(track, s, sound):
    """Mix a sound into a track at time s."""
    part = track[max(round(s * SR), 0):][:len(sound)]
    part += sound[:len(part)]


def scene():
    """The digging, its answer from ground and shrubs, and the wind."""
    at_blade = drags() + bursts() + thuds() + stones() + sings() + lifts() + dust()
    digging = ports(at_blade) + spray()
    return digging + amp(-10.0) * bush(digging) + wind()


def record(dry):
    """The recorder keeps nothing above its band limit."""
    top_hz = 16200
    return filtered(dry, lambda hz: hz < top_hz)


dry = scene()
out = record(dry)
put_to_file(out)
```